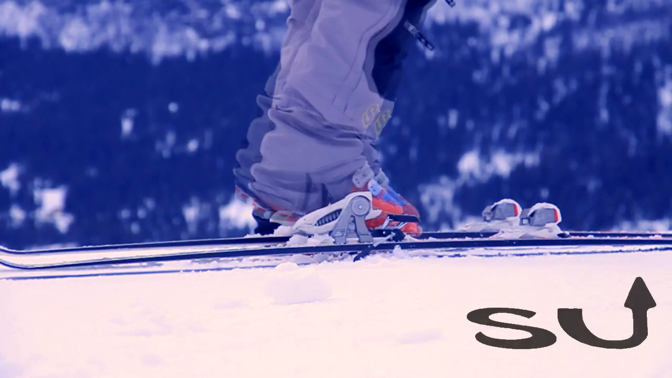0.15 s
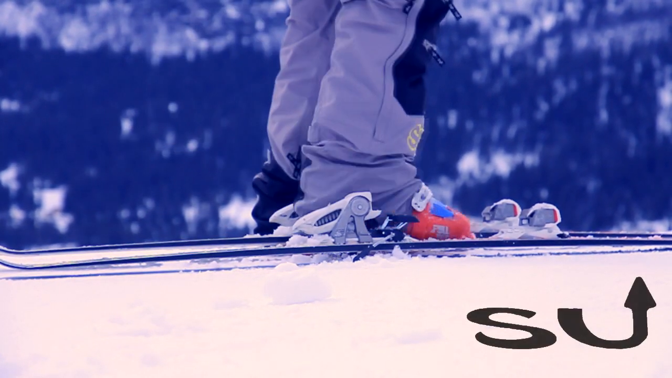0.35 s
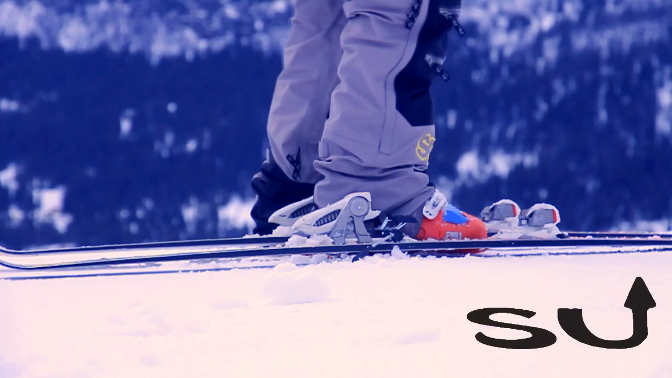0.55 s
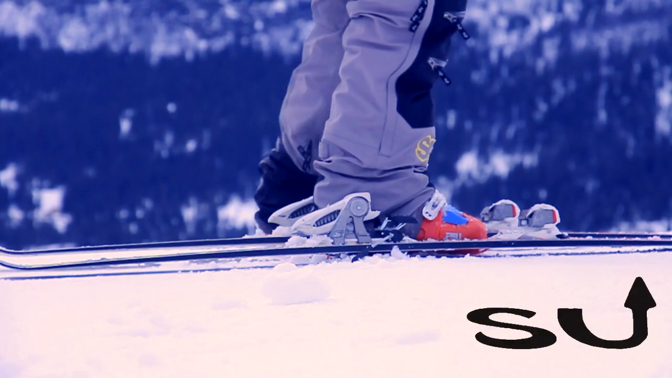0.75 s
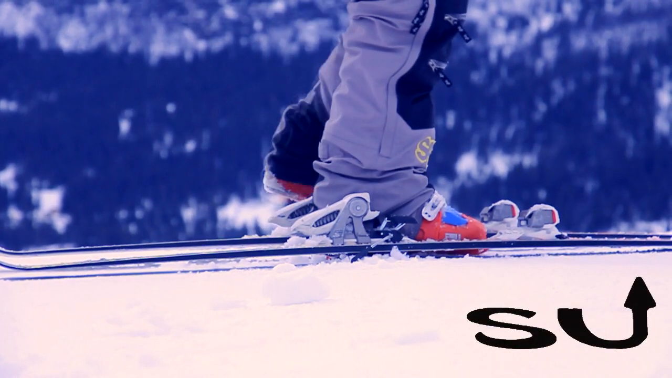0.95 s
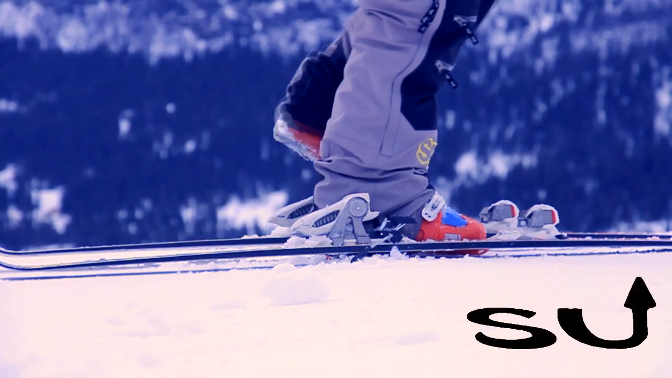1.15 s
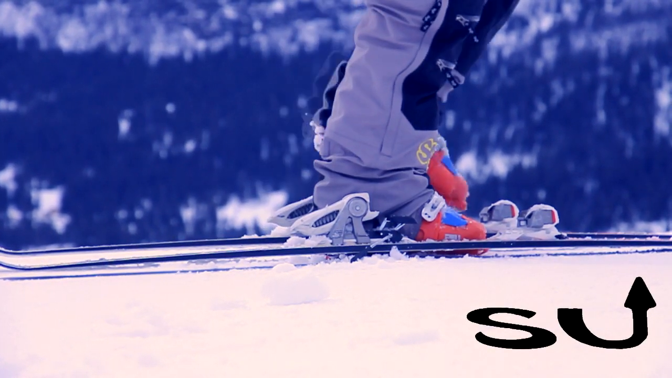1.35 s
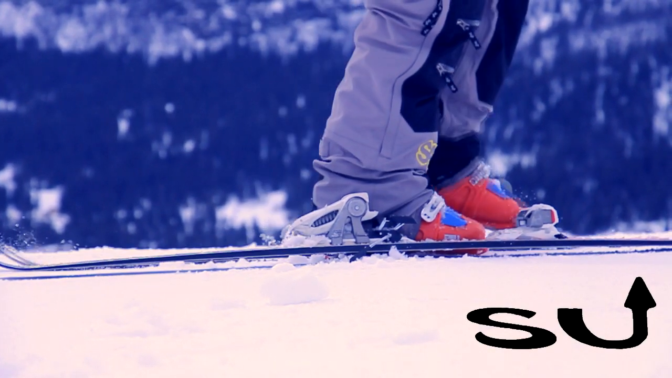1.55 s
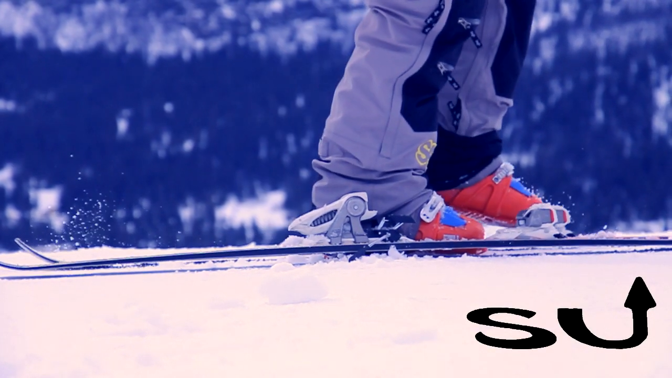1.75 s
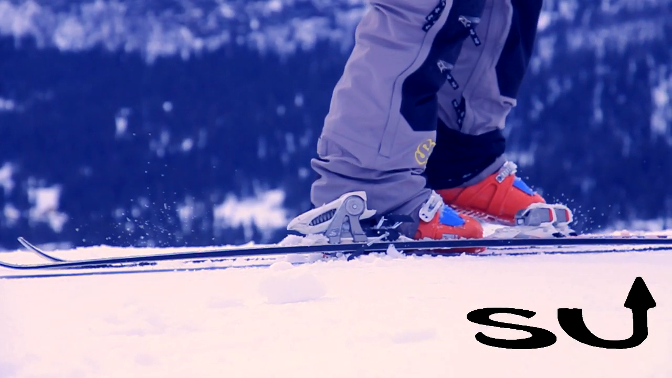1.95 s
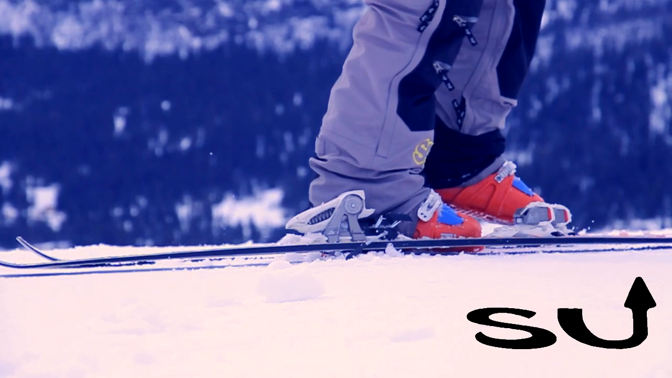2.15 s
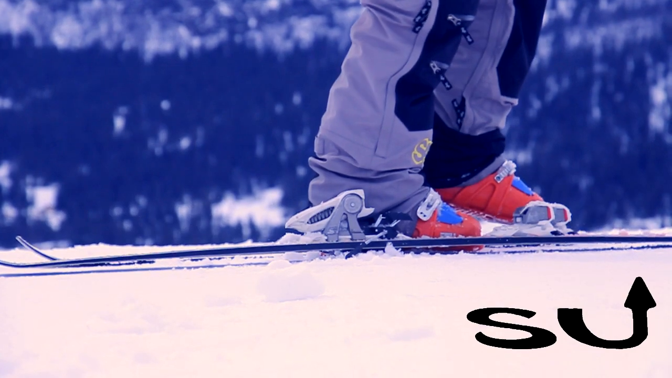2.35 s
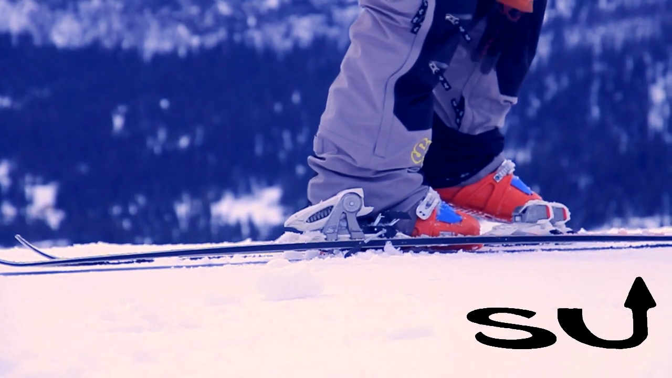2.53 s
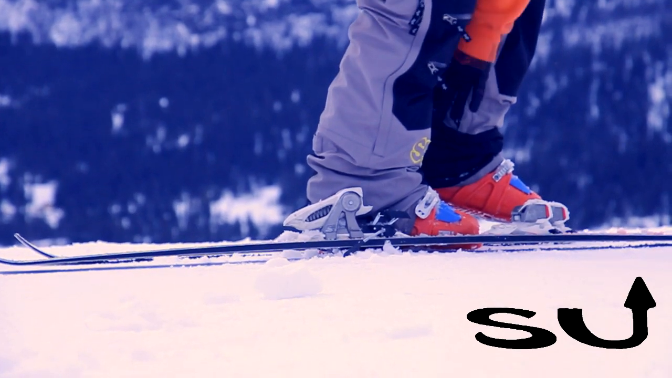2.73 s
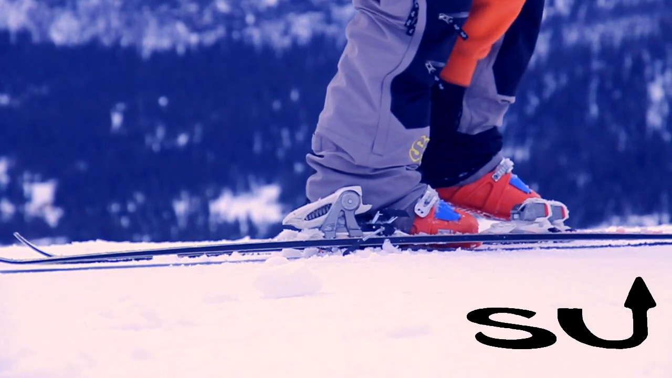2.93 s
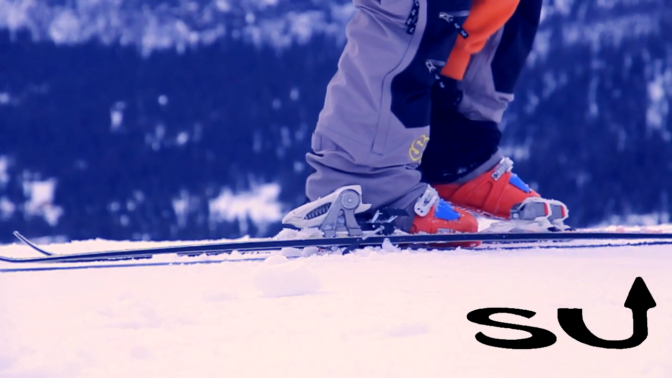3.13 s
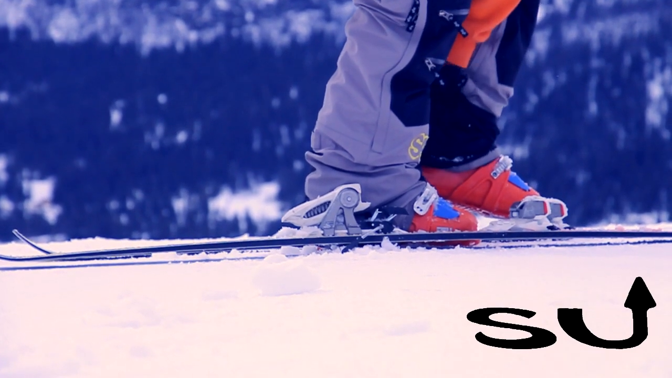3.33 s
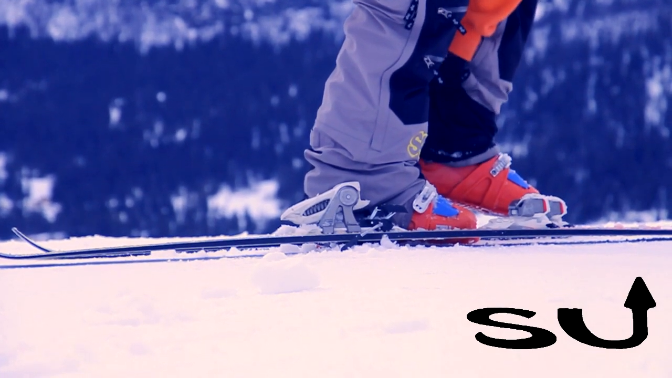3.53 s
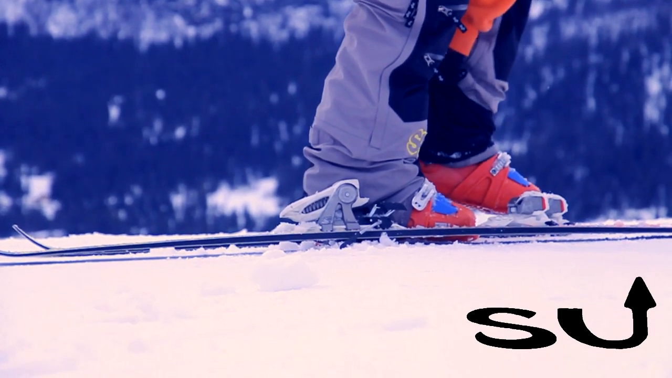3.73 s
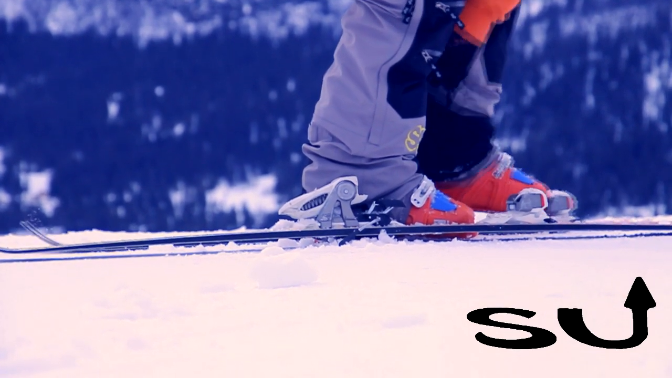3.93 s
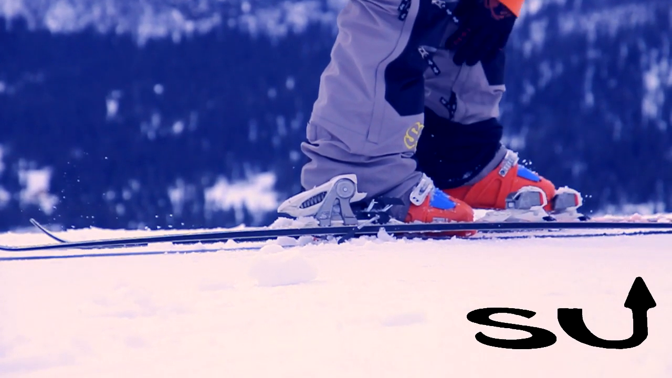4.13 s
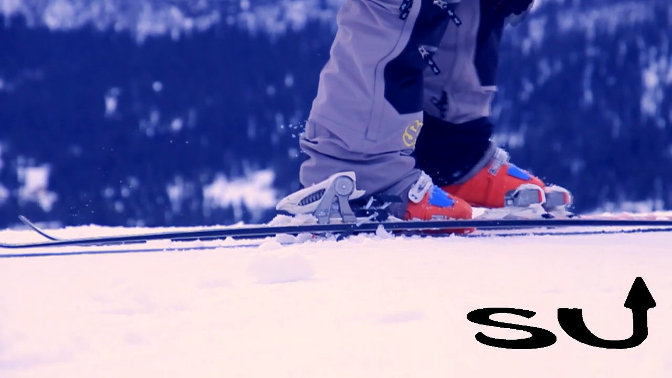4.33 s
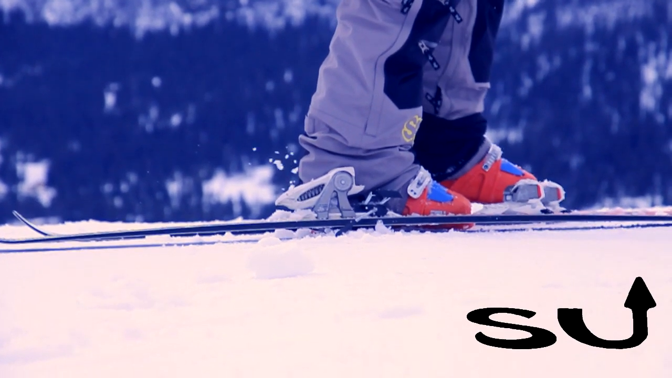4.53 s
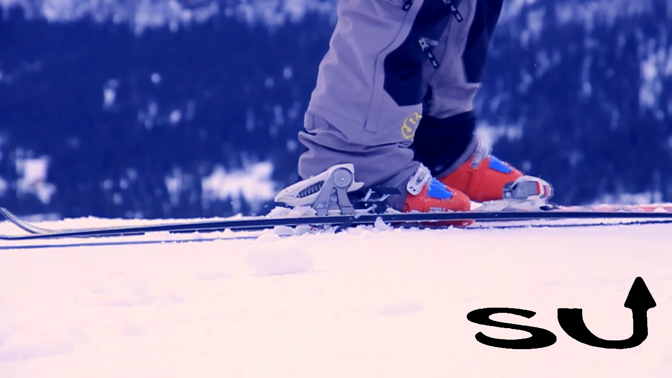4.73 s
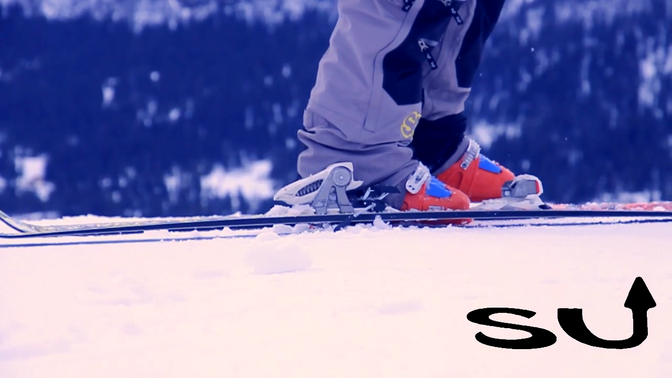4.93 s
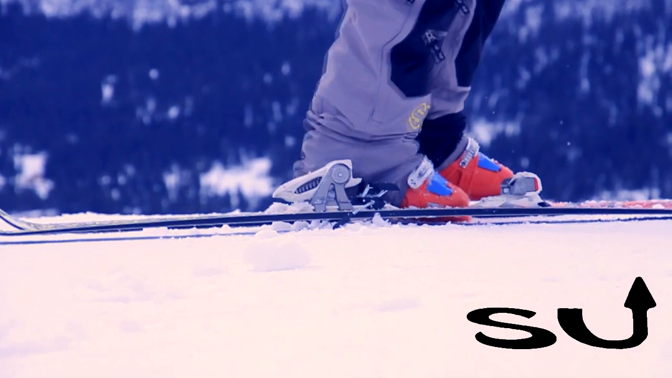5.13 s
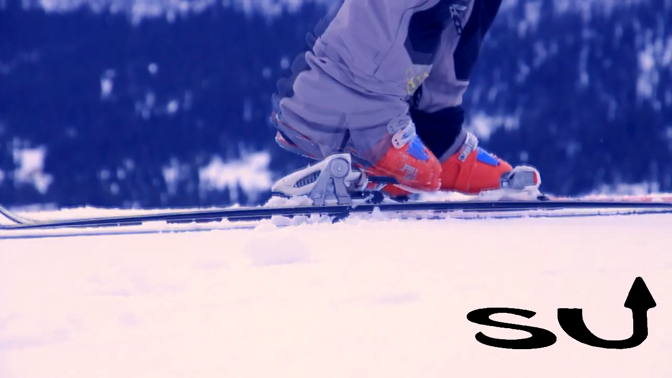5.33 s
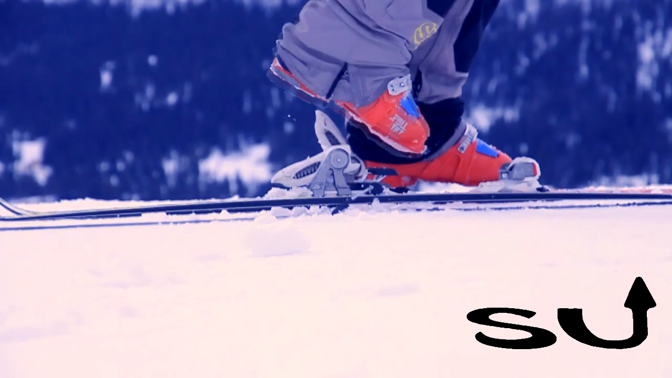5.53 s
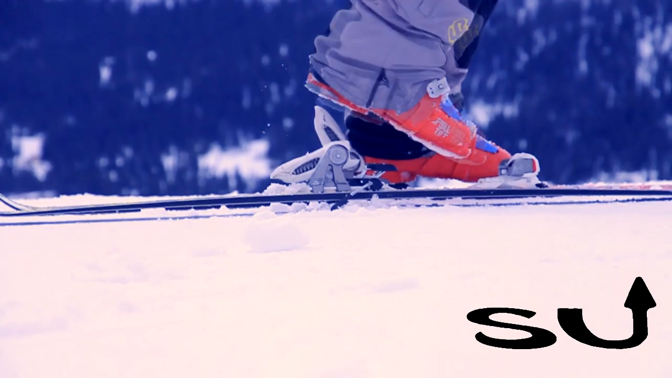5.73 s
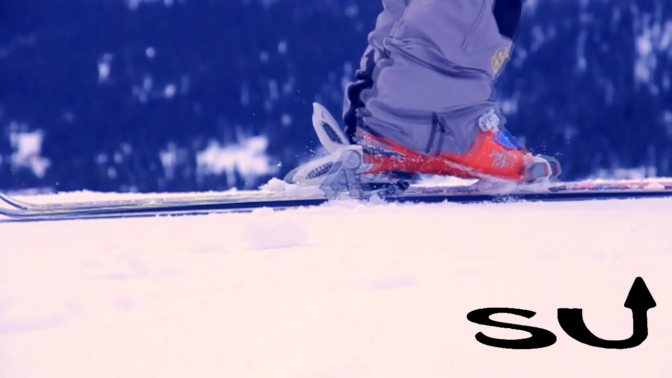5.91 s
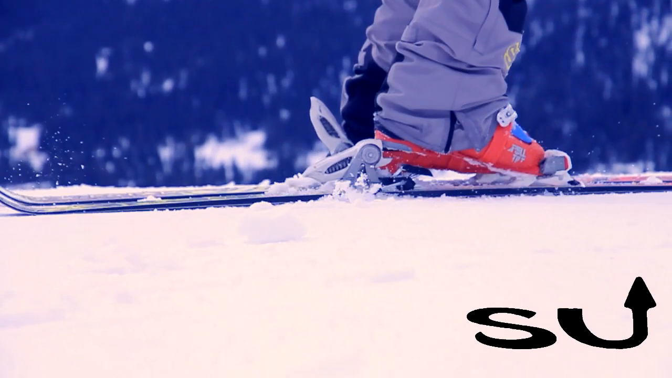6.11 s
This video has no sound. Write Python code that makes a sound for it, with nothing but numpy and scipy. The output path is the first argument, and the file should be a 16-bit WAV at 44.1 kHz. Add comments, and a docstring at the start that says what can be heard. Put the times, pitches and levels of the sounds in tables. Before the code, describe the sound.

Outdoors on snow, heard close and dry, mostly centred. From 0.1 to 1.1 seconds a ski boot makes very quiet scuffs and taps against a binding, over faint low wind, creaking snow and thin, slightly wide hiss. At 1.5 seconds it stamps in: a rapid cluster of hard plastic knocks, bright cracks and a deep thump, strongest at 1.6, then crunching snow and cloth rustle. It stays quiet until small rubs and a faint metallic buckle clink at 2.6, with another weaker one at 3.2. Around 4.0 a second sharp, weighty clunk snaps, followed until 4.5 by small dry spring ticks spreading apart. Light taps come near 4.9 to 5.2, with a low wind flutter. From 5.9 to 6.1 the final, longest clatter of snaps and thumps lands, and coarse sliding snow swells under the ski at the end.

```python
"""Quiet scuffs come first: a ski boot kicks snow off against a binding, close by on a slope.
It then stamps into the toe piece and the heel piece; each contact cracks, knocks the shell, flexes the ski and
thumps the snow. Between stamps a buckle clinks, later a spring ticks, and at the end the ski starts to slide.
Blows ring resonant bodies; shaped, lumpy noise makes the friction, rustle, creak, faint wind and hiss.
The scene sits in the middle and only part of the hiss is wide."""
import sys
import numpy as np
from scipy import signal
from scipy.fft import rfft, irfft, next_fast_len
from scipy.io import wavfile
from scipy.ndimage import uniform_filter1d, map_coordinates

SR = 44100
rng = np.random.default_rng(int(sys.argv[2]) if len(sys.argv) > 2 else 0)


def bounce(signal):
    """Save signal as a 16-bit WAV file at the path given by the first command-line argument."""
    frames = np.transpose(np.atleast_2d(signal))
    limited = np.clip(frames, -1, 1)
    pcm = np.round(limited * 32767).astype(np.int16)
    wavfile.write(sys.argv[1], SR, pcm)


N = 276228  # length in samples


def amp(db):
    """Turn dB into gain."""
    return 10 ** (np.asarray(db) / 20)


def unit(x):
    """Scale x to an rms of 1."""
    return x / np.sqrt(np.mean(x ** 2) + 1e-20)


def filtered(x, response):
    """Multiply the spectrum of x by a response of frequency; the padding leaves room for tails."""
    size = next_fast_len(N + SR // 2)
    hz = np.fft.rfftfreq(size, 1 / SR)
    return irfft(rfft(x, size) * response(hz), size)[..., :N]


def coloured(x, points):
    """Shape x with a curve of (pitch_hz, density_db) points, straight on a log frequency axis."""
    pitch_hz, density_db = np.transpose(points)

    def curve(hz):
        return amp(np.interp(np.log(hz + 1), np.log(pitch_hz + 1), density_db))

    return filtered(x, curve)


def ringing(x, modes, contact_s):
    """Ring causal resonances that all start the same way; a longer contact is a softer push."""
    def pushed(f):
        body = sum(amp(db) * 1j * f * width / (pitch ** 2 - f ** 2 + 1j * f * width)
                   for pitch, width, db in modes)
        push = 1 / (1 + 2j * np.pi * f * contact_s) ** 3
        radiation = 1j * f / (modes[0][0] / 2 + 1j * f)  # little is radiated below the first mode
        return body * push * radiation

    peak = np.abs(filtered(signal.unit_impulse(N), pushed)).max()
    return filtered(x, pushed) / peak  # a unit impulse peaks at 1


def wobble(rate_hz):
    """Draw a smooth random curve through rate_hz knots a second."""
    knots = rng.standard_normal(int(N * rate_hz / SR) + 4)
    return map_coordinates(knots, [np.arange(N) * rate_hz / SR])


def grainy(spectrum, grain_db, rate_hz):
    """Coloured noise at rms 1 whose level varies in small lumps, with a weaker, slower swell."""
    lumps_db = grain_db * wobble(rate_hz) + 0.12 * grain_db * wobble(rate_hz / 6)
    return unit(coloured(amp(lumps_db) * rng.standard_normal(N), spectrum))


def blows(start_s, level_db):
    """Place an impulse at each contact."""
    return np.bincount(np.round(start_s * SR).astype(int), amp(level_db), N)[:N]


def dying(x, t60_s):
    """Let each impulse fall exponentially, by 60 dB in t60_s."""
    return signal.lfilter([1], [1, -amp(-60 / (t60_s * SR))], x)


def shaken(start_s, level_db, modes, contact_s, chatter_db, t60_s):
    """A clean blow, then a spiky rattle of small rebounds that keeps the body ringing."""
    hit = blows(start_s, level_db)
    rebounds = unit(rng.standard_normal(N) * rng.exponential(size=N))
    chatter = amp(chatter_db) * dying(hit, t60_s) * rebounds
    return ringing(hit + chatter, modes, contact_s)


def stroke(rows, rise_s, fall_s):
    """Gain of strokes: rise for rise_s up to the start, hold for the length, then fall for fall_s."""
    t = np.arange(N) / SR
    gain = 0
    for start_s, length_s, level_db in rows:
        rising = (t - start_s) / rise_s
        falling = (start_s + length_s - t) / fall_s
        gain = gain + amp(level_db) * np.clip(np.minimum(rising, falling) + 1, 0, 1) ** 2
    return gain


# Contacts of boot, binding and ski: start_s [s], knock_db (hardness) [dB], weight_db [dB]
CONTACT_HITS = [(0.079, -55, -43), (0.271, -68, -47), (0.394, -52, -47), (0.43, -53, -41.5),
                (0.507, -54, -42), (0.521, -55.5, -40.5), (0.542, -56, -44), (0.614, -55, -43.5),
                (0.655, -57, -46), (0.672, -57, -46), (0.686, -56.5, -45), (0.919, -67, -46.5),
                (1.038, -51, -58), (1.091, -66, -42.5), (1.4986, -35, -30), (1.504, -27.5, -27.5),
                (1.517, -42, -26.5), (1.522, -56, -26.5), (1.54, -39, -26), (1.545, -29.5, -29),
                (1.556, -42, -25), (1.565, -42, -30), (1.578, -55, -35), (1.594, -41.5, -28.5),
                (1.606, -21, -13.5), (1.611, -39, -23), (1.617, -47, -26), (1.623, -50, -31),
                (1.631, -34.5, -24), (1.644, -42, -24.5), (1.661, -57, -35), (1.675, -43, -41),
                (1.701, -62, -47), (1.76, -54, -43), (1.8, -51, -50), (2.006, -54, -59), (2.444, -55, -58),
                (2.585, -47.5, -61), (3.139, -51.5, -50), (3.193, -54, -48.5), (3.773, -47, -39),
                (3.913, -61, -60), (3.933, -49, -56), (3.983, -31.5, -42), (3.992, -49, -29),
                (4.0029, -26.5, -16), (4.007, -27.5, -18), (4.016, -34, -17), (4.021, -33.5, -23),
                (4.033, -28.5, -19.5), (4.043, -47, -18.5), (4.062, -35, -27), (4.084, -54, -37),
                (4.11, -46, -38.5), (4.929, -46, -39), (5.118, -51.5, -42), (5.158, -53, -45),
                (5.201, -47, -44), (5.225, -48, -40.5), (5.529, -52.5, -70), (5.825, -48.5, -39),
                (5.888, -65, -68), (5.9072, -22.5, -29.5), (5.917, -19.5, -26), (5.924, -43, -29.5),
                (5.936, -31.5, -14), (5.951, -27.5, -34), (5.967, -42, -21), (5.974, -28.5, -15.5),
                (5.991, -18.5, -15), (5.997, -24, -22), (6.003, -40, -32), (6.01, -37, -18),
                (6.019, -34, -16.5), (6.029, -31.5, -21), (6.044, -30.5, -20.5), (6.058, -39.5, -23),
                (6.065, -39, -34.5), (6.074, -39.5, -27), (6.084, -35.5, -27), (6.169, -46, -53),
                (6.219, -50, -51)]


def contacts():
    """Each contact has a time, a hard knock for the boot and binding, and a weight for the ski and snow."""
    return np.transpose(CONTACT_HITS)


# Boot plastic resonances: pitch_hz [Hz], width_hz [Hz], relative level_db [dB]
SHELL_MODES = [(648, 85, 3), (912, 420, 4.5), (1196, 270, -5), (1460, 175, -2), (1633, 27, 7)]


def boot_shell():
    """The hard knock of each contact rings the plastic boot."""
    start_s, knock_db, _ = contacts()
    return shaken(start_s, knock_db, SHELL_MODES, contact_s=0.00007, chatter_db=-17.5, t60_s=0.049)


# Short bright snaps of ice or snow, alone or within a stamp: start_s [s], level_db [dB]
SNOW_SNAPS = [(0.309, -59), (0.345, -53), (0.357, -54), (0.393, -61), (0.506, -62), (0.549, -55),
              (1.5009, -36.5), (1.516, -41), (1.547, -37.5), (1.556, -46), (1.564, -48), (1.677, -72),
              (1.719, -60), (1.826, -53.5), (2.443, -67), (2.586, -75), (3.139, -74), (3.624, -58.5),
              (3.891, -60), (3.961, -45), (3.984, -36), (4.075, -63), (4.922, -47.5), (5.018, -55.5),
              (5.211, -54.5), (5.245, -55), (5.28, -56), (5.917, -35), (5.953, -41), (5.968, -43),
              (6.011, -45), (6.064, -63), (6.116, -55), (6.22, -50.5)]
# Tone of cracks and scraping grains: pitch_hz [Hz], relative density_db [dB per Hz]
CRACK_SPECTRUM = [(1290, 0), (2200, -5), (2530, -7), (2810, -0.5), (3180, -3.5), (4280, -6.5), (5080, -7.5),
                  (6490, -13.5), (9330, -29), (10600, -48), (13800, -59), (22000, -120)]
CRACK_DB = -19.5  # against the knock


def binding_crack():
    """Contacts crack at the binding and ice or snow snaps, all as short bursts of bright noise."""
    start_s, knock_db, _ = contacts()
    hits = blows(start_s, knock_db + CRACK_DB) + blows(*np.transpose(SNOW_SNAPS))
    grit = rng.standard_normal(N)
    burst = grit * dying(hits, t60_s=0.023)
    return coloured(burst, CRACK_SPECTRUM) / np.std(coloured(grit, CRACK_SPECTRUM))


# Ski bending resonances: pitch_hz [Hz], width_hz [Hz], relative level_db [dB]
SKI_MODES = [(215, 63, -1.5), (269, 66, -0.5), (432, 29, -16)]


def ski_flex():
    """The weight of each contact bends the ski, which rings low."""
    start_s, _, weight_db = contacts()
    return shaken(start_s, weight_db, SKI_MODES, contact_s=0.00028, chatter_db=-38, t60_s=0.05)


# How hard the snow thumps back, against the weight: from_s [s], level_db [dB]
SNOW_ANSWER = [(0, -9), (1.45, 1.5), (1.6, -5), (1.7, -10), (3.99, 2), (4.04, -10.5), (5.9, -7)]
SNOW_LAG_S = 0.0027  # the thump follows the contact


def thumps():
    """Time and level of the snow's answer to each contact."""
    start_s, _, weight_db = contacts()
    from_s, answer_db = np.transpose(SNOW_ANSWER)
    current = np.searchsorted(from_s, start_s) - 1
    return start_s + SNOW_LAG_S, weight_db + answer_db[current]


# Snow resonances: pitch_hz [Hz], width_hz [Hz], relative level_db [dB]
SNOW_MODES = [(69.2, 11, -3.5), (98.7, 7, 1.5), (154.6, 125, 5)]


def snow_thump():
    """The snow pushes back against the ski with a soft, deep thump of opposite sign."""
    return -shaken(*thumps(), SNOW_MODES, contact_s=0.0006, chatter_db=-40, t60_s=0.07)


# The brake spring slips back in steps: start_s [s]
SPRING_TICKS = [4.11, 4.1295, 4.157, 4.1805, 4.1985, 4.2195, 4.2425, 4.2714, 4.3043, 4.3413, 4.3911, 4.5054]
# Spring resonances: pitch_hz [Hz], width_hz [Hz], relative level_db [dB]
SPRING_MODES = [(1800, 450, 0), (3300, 800, 4), (5250, 450, 3)]
FIRST_TICK_DB, TICK_GROWS_DB = -45.5, 0.27  # each slip is a little stronger


def spring():
    """Short dry ticks of the slipping spring, spreading out towards the end."""
    level_db = FIRST_TICK_DB + TICK_GROWS_DB * np.arange(len(SPRING_TICKS))
    return shaken(np.array(SPRING_TICKS), level_db, SPRING_MODES,
                  contact_s=0.00007, chatter_db=-27, t60_s=0.02)


# Touches on a boot buckle: start_s [s], level_db [dB]
BUCKLE_CLINKS = [(2.59, -48), (3.197, -53)]
# Buckle resonances: pitch_hz [Hz], width_hz [Hz], relative level_db [dB]
BUCKLE_MODES = [(1520, 9, -1), (1900, 120, -18), (3020, 52, -22)]


def buckle():
    """A small metal lever is brushed and rings faintly."""
    start_s, level_db = np.transpose(BUCKLE_CLINKS)
    return shaken(start_s, level_db, BUCKLE_MODES, contact_s=0.00004, chatter_db=-27, t60_s=0.08)


# Tone of crushed snow: pitch_hz [Hz], relative density_db [dB per Hz]
CRUSH_SPECTRUM = [(30, -19), (70, -7.5), (150, -0.5), (300, -1), (500, -7.5), (1000, -32.5), (3000, -120)]
CRUSH_DB, CRUSH_T60_S = -29.5, 0.34  # level against the thump


def snow_crush():
    """Snow grains crunch under each contact and settle."""
    pressure = amp(CRUSH_DB) * dying(blows(*thumps()), CRUSH_T60_S)
    return pressure * grainy(CRUSH_SPECTRUM, grain_db=1.5, rate_hz=44)


# The sole drags over icy snow: start_s [s], length_s [s], level_db [dB]
SOLE_DRAGS = [(0.35, 0.028, -64), (0.39, 0.1, -71), (0.5, 0.06, -70.5), (1.505, 0.012, -50.5),
              (1.55, 0.024, -60.5), (1.66, 0.19, -72.5), (2.4, 0.024, -73), (2.588, .03, -75),
              (3.086, 0.19, -73), (3.78, 0.026, -67), (3.898, 0.11, -65), (4.005, 0.035, -61),
              (4.08, 0.18, -73.5), (5.19, 0.13, -73.5), (5.915, 0.014, -50.5), (6, 0.065, -67),
              (6.22, .04, -68)]
SPRAY_DB, SPRAY_T60_S = -32, 0.11  # grit thrown off by each contact, level against its knock
SPRAY_RISE_S = 0.004  # grit takes a moment to fly


def spray_and_drag():
    """Bright grains fly off at each contact and scrape under the dragging sole."""
    start_s, knock_db, _ = contacts()
    thrown = dying(blows(start_s + SPRAY_RISE_S / 2, knock_db + SPRAY_DB), SPRAY_T60_S)
    spray = uniform_filter1d(thrown, round(SPRAY_RISE_S * SR))
    drag = stroke(SOLE_DRAGS, rise_s=0.006, fall_s=0.049)
    return (spray + drag) * grainy(CRACK_SPECTRUM, grain_db=3.0, rate_hz=180)


# The ski starts to slide: start_s [s], length_s [s], level_db [dB]
SKI_SLIDES = [(6.22, .1, -45)]
# Tone of the gliding ski: pitch_hz [Hz], relative density_db [dB per Hz]
GLIDE_SPECTRUM = [(200, -39), (330, -17), (460, 18.5), (600, 1.5), (900, -16), (1300, -20), (1900, -6),
                  (2300, -17), (2650, -11), (3300, -42), (4450, -19), (5200, -37), (7000, -38),
                  (12000, -84)]


def ski_slide():
    """Grains crunch under the sliding ski as a swelling, coarse noise."""
    glide = stroke(SKI_SLIDES, rise_s=0.26, fall_s=0.1)
    return glide * grainy(GLIDE_SPECTRUM, grain_db=4.0, rate_hz=160)


# Levels of the quiet layers: start_s [s], wind_db [dB], creak_db [dB], rustle_db [dB]
QUIET_LAYERS = [(0.0, -61, -63, -68), (0.38, -63, -58.5, -68), (1.01, -61.5, -57.5, -67),
                (1.29, -53, -62, -66.5), (1.51, -62, -61.5, -63), (1.66, -65, -49, -59.5),
                (1.88, -62.5, -62.5, -68.5), (2.47, -56.5, -59, -66), (3.71, -59, -59, -64.5),
                (4.01, -69, -57.5, -56), (4.37, -67, -60.5, -69.5), (4.74, -63, -62, -65.5),
                (5.09, -52, -55.5, -65.5), (5.3, -61.5, -63, -68.5), (5.63, -60.5, -61.5, -67.5),
                (5.91, -59, -56.5, -67), (6.08, -56, -59, -57.5), (6.26, -57, -48.5, -48)]


def quiet_gain(column):
    """Gain of one quiet layer, gliding in dB between the table's points."""
    table = np.transpose(QUIET_LAYERS)
    return amp(np.interp(np.arange(N) / SR, table[0], table[column]))


# Trouser and glove rub on the boot: start_s [s], length_s [s], level_db [dB]
CLOTH_RUBS = [(1.7, .14, -71.5), (2.41, 0.028, -75), (2.545, 0.098, -64.5), (3.135, 0.026, -61.5),
              (3.19, 0.032, -72), (3.28, 0.059, -69), (3.89, 0.03, -76)]
# Tone of cloth: pitch_hz [Hz], relative density_db [dB per Hz]
RUSTLE_SPECTRUM = [(410, -22), (700, -4.5), (949, -1), (1090, -3), (1500, -3.5), (1590, -2.5), (1930, -8),
                   (2070, -10.5), (2380, -11.5), (3260, -27), (5000, -33), (6500, -34), (11000, -120)]


def cloth_rustle():
    """Rubbing cloth makes a drifting rustle with short strokes on top."""
    gain = quiet_gain(column=3) + stroke(CLOTH_RUBS, rise_s=0.012, fall_s=0.035)
    return gain * grainy(RUSTLE_SPECTRUM, grain_db=1.5, rate_hz=56)


# Tone of creaking snow: pitch_hz [Hz], relative density_db [dB per Hz]
CREAK_SPECTRUM = [(59, -6), (100, 2), (172, -3), (285, -1), (408, -4), (464, -1.5), (709, -12.5),
                  (900, -22), (1170, -60), (1980, -120)]


def snow_creak():
    """Snow under the standing foot creaks as low, lumpy noise."""
    return quiet_gain(column=2) * grainy(CREAK_SPECTRUM, grain_db=2.5, rate_hz=60)


# Tone of wind buffeting: pitch_hz [Hz], relative density_db [dB per Hz]
WIND_SPECTRUM = [(8.8, -30), (15, -5), (22, 7.5), (75, -2), (102, -14), (200, -28), (260, -70), (440, -120)]


def wind():
    """Wind on the microphone is a deep, slowly fluttering noise."""
    return quiet_gain(column=1) * grainy(WIND_SPECTRUM, grain_db=2, rate_hz=14)


# Tone of the hiss common to both channels: pitch_hz [Hz], relative density_db [dB per Hz]
HISS_SPECTRUM = [(1470, -17), (2500, -4), (3300, -2), (5630, -5.5), (9370, -13), (10600, -19), (13800, -35),
                 (22000, -120)]


def far_hiss():
    """The far hiss in the middle is constant, nearly even noise."""
    return amp(-78.0) * grainy(HISS_SPECTRUM, grain_db=1.0, rate_hz=59)


# Tone of the hiss opposite in the channels: pitch_hz [Hz], relative density_db [dB per Hz]
WIDE_SPECTRUM = [(35, -24), (60, -17), (108, -1), (413, -8), (480, -9), (535, -5.5), (1620, -7.5),
                 (3160, -3.5), (7860, -7.5), (10600, -14), (13800, -44), (22000, -120)]


def wide_hiss():
    """Uneven noise that goes to the two channels with opposite sign, so it sounds wide."""
    return amp(-79) * grainy(WIDE_SPECTRUM, grain_db=-5.0, rate_hz=26)


def scene():
    """Everything sits in the middle except the wide hiss."""
    boot = boot_shell() + binding_crack() + ski_flex() + snow_thump()
    details = spring() + buckle()
    friction = snow_crush() + spray_and_drag() + ski_slide()
    background = cloth_rustle() + snow_creak() + wind() + far_hiss()
    mid = boot + details + friction + background
    side = wide_hiss()
    return np.array([mid + side, mid - side])


# Constant shift of each channel off zero, one row a channel: offset [full scale]
CHANNEL_OFFSET = [
    [.0041],
    [.0009],
]
TOP_HZ = 15500  # band limit


def record(dry):
    """The recorder keeps nothing above its band limit and sits slightly off zero."""
    return filtered(dry, lambda hz: hz < TOP_HZ) + CHANNEL_OFFSET


dry = scene()
out = record(dry)
bounce(out)
```